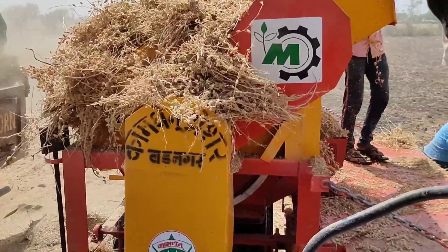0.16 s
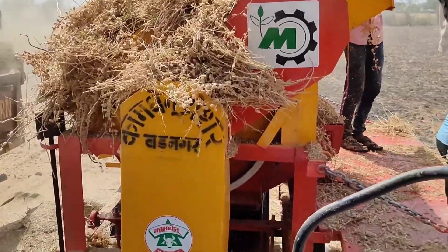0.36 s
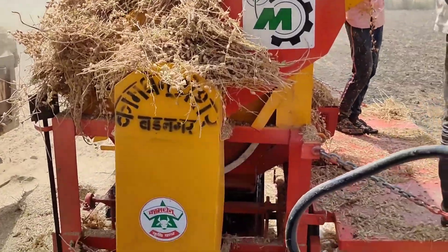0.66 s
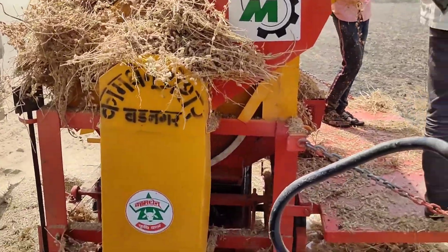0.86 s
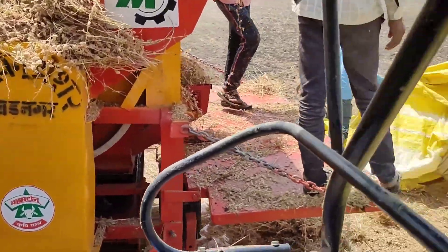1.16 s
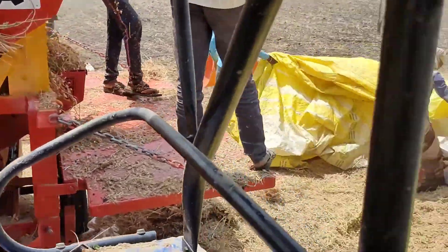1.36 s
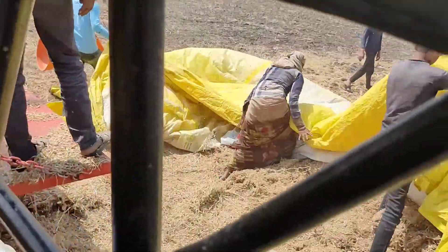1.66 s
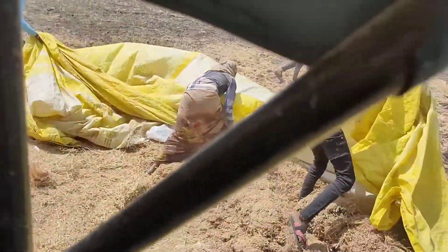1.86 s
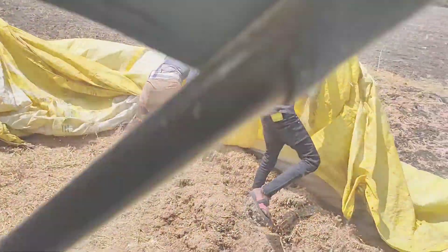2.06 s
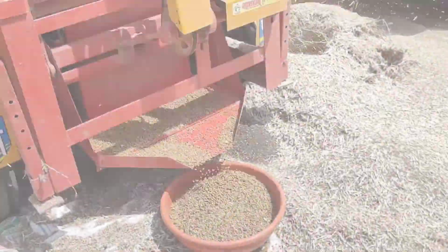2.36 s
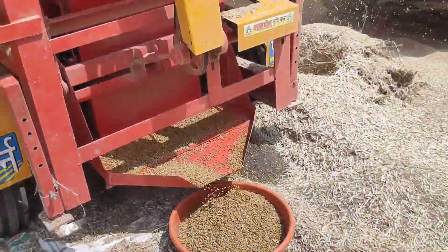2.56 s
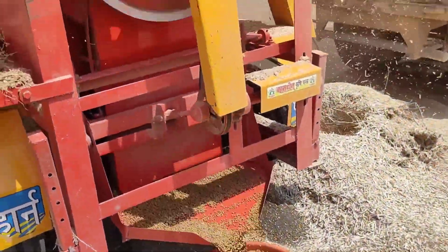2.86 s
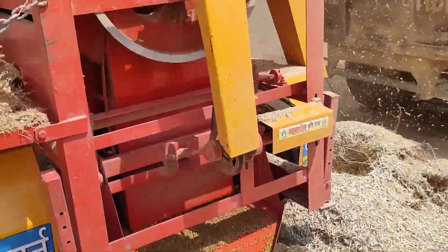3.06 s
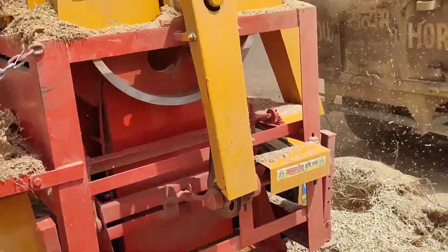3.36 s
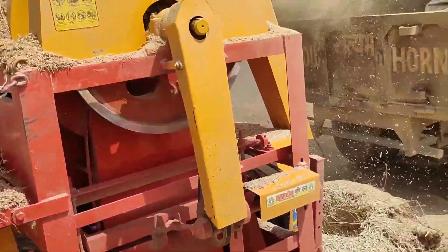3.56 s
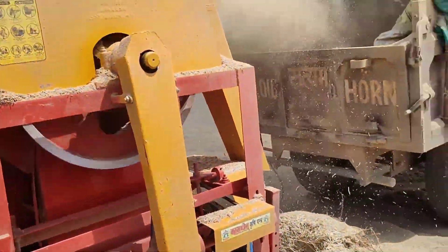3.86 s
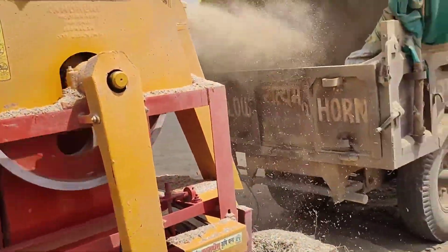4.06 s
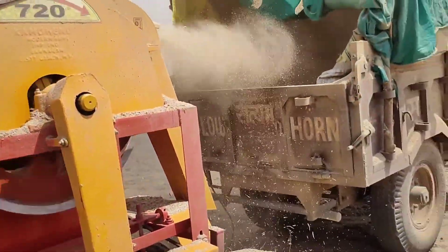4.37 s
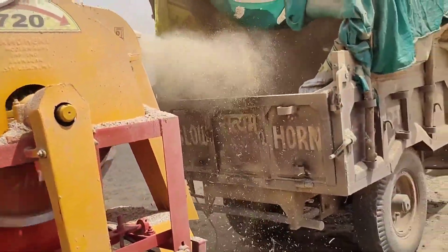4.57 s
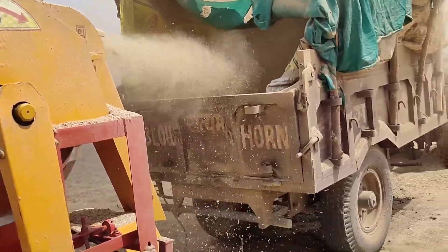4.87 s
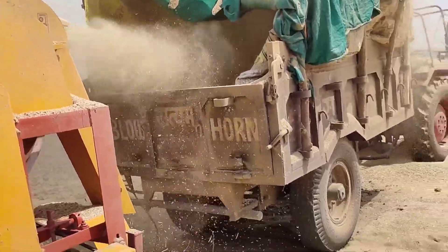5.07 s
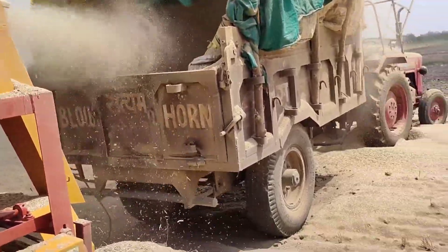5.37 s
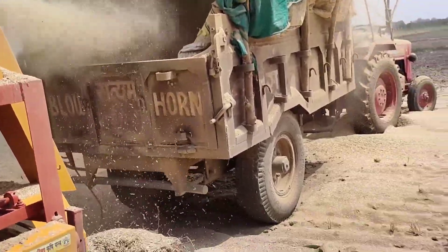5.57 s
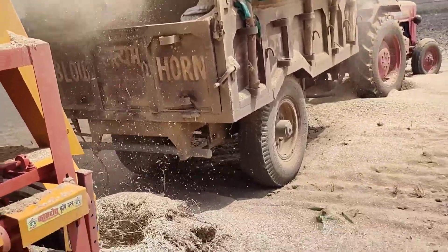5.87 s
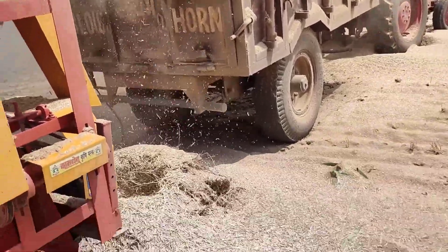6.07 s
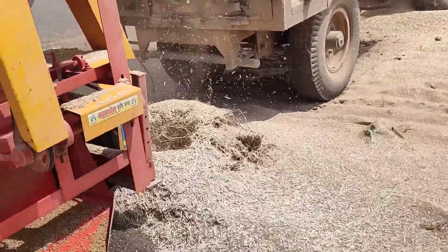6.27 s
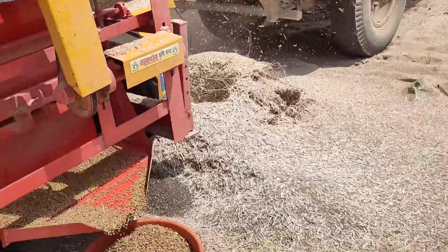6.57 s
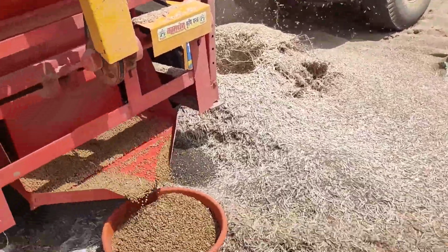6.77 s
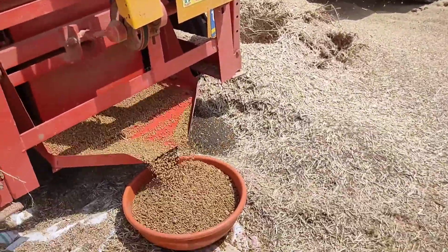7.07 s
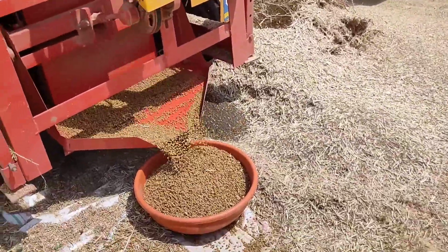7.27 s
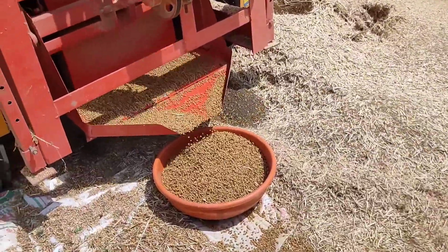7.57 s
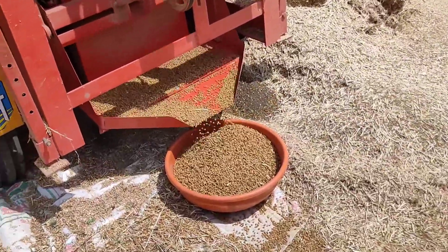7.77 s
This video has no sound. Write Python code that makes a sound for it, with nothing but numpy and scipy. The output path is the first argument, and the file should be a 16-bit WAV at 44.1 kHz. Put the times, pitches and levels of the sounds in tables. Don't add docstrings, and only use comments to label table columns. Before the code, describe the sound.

A three-cylinder diesel clatters beside a running thresher, fades to silence, then the grain chute fades in with throbbing blower, shaking sieves and sharp chaff hiss.

```python
import sys
import numpy as np
from scipy import signal
from scipy.fft import rfft, irfft, next_fast_len
from scipy.io import wavfile
from scipy.ndimage import map_coordinates

SR = 44100
rng = np.random.default_rng(int(sys.argv[2]) if len(sys.argv) > 2 else 0)


def invert_db(level):
    return 10 ** (np.asarray(level, dtype=float) / 20)


def unload_audio(sound):
    columns = np.transpose(np.atleast_2d(sound))
    steps = np.round(np.clip(columns, -1, 1) * 32767)
    wavfile.write(sys.argv[1], SR, steps.astype(np.int16))


N = 349713

CHANGE_S, FADE_S = 2.258, 0.5
ENGINE_GEAR, SIEVE_GEAR = 1.2231, 0.5405
HANDFUL_T60_S, HANDFUL_RISE_S = 0.052, 0.0024
SURGE_S, OUTLET_DB = 0.14, -50
HUM_TURNS_AWAY = -0.08

# t/s, speed/(turns per s)
SPEED_NEAR = [(0.0, 9.8143), (1.13, 9.8254), (2.26, 9.8345)]
SPEED_CHUTE = [(2.26, 8.8577), (3.07, 8.8539), (3.88, 8.8767), (4.69, 8.8989), (5.5, 8.9341), (6.31, 8.869),
               (7.12, 8.8144), (7.93, 8.83)]
# multiple of the engine cycle, level/dB
ENGINE_NEAR = [(3, -41), (6, -27), (7, -51), (9, -25), (10, -42), (12, -43), (13, -45), (15, -38),
               (18, -39), (19, -49), (24, -46), (25, -49), (33, -47), (35, -52), (36, -49), (39, -48),
               (40, -50), (48, -53), (50, -54), (58, -49), (59, -55), (62, -52), (66, -52), (69, -54),
               (80, -52), (81, -54), (86, -55), (92, -53), (95, -54), (96, -47)]
ENGINE_CHUTE = [(3, -47), (6, -42), (9, -40), (10, -54), (11, -55), (12, -53), (15, -50), (18, -57),
                (21, -52), (27, -56), (30, -57)]
# multiple of the shaft turn, level/dB
BLOWER_NEAR = [(4, -33), (5, -51), (8, -32), (9, -55), (12, -46), (16, -42), (20, -34), (24, -42),
               (28, -41), (32, -46)]
BLOWER_CHUTE = [(4, -34), (5, -49), (6, -54), (8, -32), (9, -49), (10, -57), (12, -46), (13, -56),
                (16, -52), (20, -45), (21, -50), (25, -52), (28, -40), (29, -43), (30, -46), (31, -55),
                (32, -41), (33, -48), (36, -49), (40, -50)]
# f/Hz, width/Hz, level/dB, crank angle/turns, cylinder 1 and cylinder 2
# level/dB (cylinder 3 is the reference)
KNOCK = [
    (928, 320, -41.5, 0.036, -8, 10.5),
    (1337, 400, -40.5, 0.057, 1.5, 0.5),
    (2590, 1800, -42, .16, -5, -1.5),
]
# f/Hz, level/dB
CHAFF_NEAR = [(2470, -35), (4200, -12), (4930, -5), (5320, -6), (6190, 0.5), (6590, 0.5), (7380, -4.5),
              (7810, -12.5), (8570, -41), (11100, -60), (18900, -120)]
CHAFF_CHUTE = [(2470, -39.5), (4200, -13), (4890, -7.5), (6140, 1), (6610, 1.5), (7630, -5), (7960, -18),
               (8570, -35), (11100, -66.5), (18900, -120)]
# f/Hz, level/dB
STRAW_NEAR = [(970, -31.5), (1650, -1), (2010, 2), (2190, -2), (3870, -4.5), (4200, -5), (5460, -33.5),
              (9240, -120)]
STRAW_CHUTE = [(970, -31), (1650, -8.5), (1820, -6), (2090, -5), (2400, -6.5), (4200, -1), (5460, -23.5),
               (9240, -120)]
# f/Hz, level/dB
HOOD_NEAR = [(510, -28), (860, 0), (911, -2), (1150, 0.5), (1330, -1), (1410, -2.5), (1650, -7),
             (2140, -34), (3630, -120)]
HOOD_CHUTE = [(510, -40), (860, -6.5), (988, -2), (1090, -6), (1220, -8), (1290, -5.5), (1520, -7),
              (1650, -7), (2140, -34), (3630, -120)]
# f/Hz, level/dB
CASING_NEAR = [(310, -28), (520, 0.5), (678, -0.5), (745, -3.5), (860, -2), (1120, -30.5), (1890, -120)]
CASING_CHUTE = [(310, -28.5), (520, -9), (555, -4), (662, -4), (752, 0), (860, -6), (1120, -33),
                (1890, -120)]
# f/Hz, level/dB
RUMBLE_NEAR = [(15, -43), (30, -15), (90, -9), (135, -5.5), (185, -2), (230, -4.5), (330, -3), (420, -7.5),
               (490, -5), (560, -25), (700, -64)]
RUMBLE_CHUTE = [(15, -41.5), (30, -20), (60, -14.5), (130, -9), (200, -3.5), (250, -3.5), (320, -7),
                (370, -10), (520, -10), (560, -18), (700, -61.5)]
LEVELS_NEAR = [-34, -32.5, -36.5, -27.5]
LEVELS_CHUTE = [-35, -38, -44, -31]
TURNS_AWAY = [-0.093, 0.0031, -0.55, 0.036]
# f/Hz, width/Hz, level/dB
PANELS_NEAR = [(168, 14, -45.5), (186.3, 5.4, -42.5), (313, 8.9, -46), (381.6, 9.2, -42.5),
               (400.6, 4.1, -45.5), (1403, 16, -45), (1446, 11, -50), (1594, 12, -55.5), (2055, 15, -51.5)]
PANELS_CHUTE = [(229.6, 11, -47.5), (250, 11, -41.5), (314, 8.2, -45.5), (332, 7, -48), (441, 9.3, -54),
                (510, 10, -54), (736, 7.9, -55), (906, 7.6, -54.5), (970, 6.6, -53.5), (1030, 11, -53.5),
                (1460, 9.1, -53.5), (1558, 10, -56.5)]
# t/s, chaff flow level/dB, facing/dB (+ toward the chaff stream, - toward the machine)
PAN_NEAR = [(0.0, -23.5, -0.45), (0.12, -22, 0.047), (0.8, -23.5, 0.042), (1.3, -23, 0), (1.8, -25.5, 0.3),
            (2.2, -24, -0.5)]
PAN_CHUTE = [(2.3, -20, -3.5), (2.7, -22.5, -4.5), (3.05, -20.5, -4), (3.4, -21, -2), (3.65, -19.5, 1.2),
             (4.35, -20.5, 6), (5.8, -20.5, 4), (6.4, -20.5, -1.5), (6.95, -21.5, -6), (7.12, -23.5, -5),
             (7.42, -24, -6), (7.75, -22, -6.5)]
# t/s, peak level/dB
HANDFULS = [(0.0458, -13.5), (2.4049, -14), (2.7656, -9), (2.8903, -6), (3.0809, -6), (3.3154, -6.5),
            (3.6536, -2.5), (3.7354, -9.5), (4.122, -7.5), (4.3011, -7), (4.3555, -10), (4.4238, -7.5),
            (4.4697, -9), (4.5965, -4.5), (4.7002, -8.5), (4.9127, -12), (4.9551, -11), (5.1861, -12.5),
            (5.4101, -6.5), (5.5059, -8.5), (5.7284, -8), (5.908, -6), (6.3804, -11), (6.4782, -4.5),
            (6.5275, -10), (6.9461, -9.5), (6.994, -6), (7.1337, -9.5), (7.5218, -6), (7.7114, -10.5)]
# f/Hz, width/Hz, level/dB
SIEVE = [(720, 230, -9.5), (1150, 93, -7.5), (1550, 140, -4.5), (2110, 150, -2), (3600, 910, -7)]
# t/s, level/dB over the resting outlet
SURGES = [(3.0, 8), (3.5, 3), (3.82, 5), (4.4, 4.5), (4.8, 3), (5.25, 6), (5.75, 9.5), (6.75, 9),
          (7.45, 4.5), (7.85, 10)]
# f/Hz, width/Hz, level/dB
OUTLET = [(979, 70, 0)]


def unit(x):
    return x / np.sqrt(np.mean(x ** 2) + 1e-20)


def curves(rows):
    s, *columns = np.transpose(rows)
    return [np.interp(np.arange(N) / SR, s, column) for column in columns]


def wobble(rate):
    coarse = np.arange(0, N + 64, 64)
    knots = rng.standard_normal(int(N * rate / SR) + 4)
    smooth = map_coordinates(knots, [coarse * rate / SR])
    return np.interp(np.arange(N), coarse, smooth)


def filtered(x, response):
    m = next_fast_len(N + SR // 2)
    return irfft(rfft(x, m) * response(np.fft.rfftfreq(m, 1 / SR)), m)[:N]


def colour(x, spectrum):
    hz, db = np.transpose(spectrum)
    return unit(filtered(x, lambda f: invert_db(np.interp(np.log(f + 1), np.log(hz + 1), db))))


def resonate(x, modes):
    def ring(f):
        total = 0
        for k, (hz, width_hz, db) in enumerate(modes):
            damping = 1j * f * width_hz
            total = total + (-1) ** k * invert_db(db) * damping / (hz * hz - f * f + damping)
        return total
    return unit(filtered(x, ring))


def grit(spread_db):
    return rng.standard_normal(N) * invert_db(spread_db * rng.standard_normal(N))


def shaft(speed, start_s):
    turns = np.cumsum(curves(speed)[0]) / SR
    return turns - turns[round(start_s * SR)]


def blows(turns, angle, fall):
    since = (turns - angle) % 1
    return since / fall * np.exp(1 - since / fall)


def tones(turns, orders, count, start, lead, lag, uneven, flutter_db):
    out = np.zeros(N)
    for multiple, db in orders:
        k = round(multiple)
        phase = k * (turns + lead) + start + lag / k + uneven * (k % count)
        unsteady = flutter_db * k / 10 * wobble(4)
        out += invert_db(db + unsteady) * np.sqrt(2) * np.cos(2 * np.pi * phase)
    return out


def knock(cycle):
    out = np.zeros(N)
    for hz, width_hz, db, angle, first_db, second_db in KNOCK:
        same = rng.standard_normal(3600)[(cycle % 1 * 3600).astype(int)]
        cylinder = ((cycle - angle) % 1 * 3).astype(int)
        size = invert_db([first_db, second_db, 0])[cylinder]
        rattle = same + 0.67 * rng.standard_normal(N)
        burst = size * blows(3 * cycle, 3 * angle, fall=0.16) * rattle
        band = [(hz, width_hz, 0)]
        out += invert_db(db) * resonate(resonate(burst, band), band)
    return out


def thresher(turns, pan, levels, colours, clumps, below_db, throb_db, limp_db):
    straw, hood, casing, rumble = colours
    facing_db = curves(pan)[1]
    straw_db, hood_db, casing_db, rumble_db = (db + per * facing_db for db, per in zip(levels, TURNS_AWAY))
    blade = throb_db * np.cos(2 * np.pi * (4 * turns - 0.4))
    limp = limp_db * np.cos(2 * np.pi * (turns - 0.47))

    rustle_db = straw_db + 0.02 + 0.5 * clumps + 0.52 * wobble(12)
    rustle = invert_db(rustle_db) * colour(grit(spread_db=3), straw)
    roar_db = hood_db - 1.45 + blade + 0.68 * clumps + 0.76 * wobble(12)
    roar = invert_db(roar_db) * colour(rng.standard_normal(N), hood)
    drone_db = casing_db - 0.35 + blade + 0.53 * wobble(11)
    drone = invert_db(drone_db) * colour(rng.standard_normal(N), casing)
    low = invert_db(rumble_db - below_db + blade + limp) * colour(rng.standard_normal(N), rumble)
    return rustle + roar + drone + low


def panels(modes):
    def ring(f):
        total = 0
        for hz, width_hz, db in modes:
            peak = 1 / (1 + (2 * (f - hz) / width_hz) ** 2)
            peak = peak / np.sqrt(np.pi * width_hz / 2 / SR)
            total = total + invert_db(db) * peak
        return total
    return filtered(rng.standard_normal(N), ring)


def chaff(pan, spectrum, clumps):
    flow_db, facing_db = curves(pan)
    grains = colour(grit(spread_db=3), spectrum)
    lower = filtered(grains, lambda f: 1 / (1 + (f / 5600) ** 6))
    upper = grains - lower
    tilted = invert_db(-0.7 * facing_db) * lower + invert_db(0.41 * facing_db) * upper
    return invert_db(flow_db - 0.56 + 0.5 * clumps + 0.9 * wobble(60)) * tilted


def near_engine():
    turns, clumps = shaft(SPEED_NEAR, 0), wobble(30.1)
    cycle = ENGINE_GEAR * turns
    exhaust = tones(cycle, ENGINE_NEAR, count=3, start=-0.613 + 1, lead=-0.045, lag=1.7,
                    uneven=-0.1, flutter_db=0.3)
    blower = tones(turns, BLOWER_NEAR, count=4, start=-0.378, lead=0.059, lag=1.57,
                   uneven=-0.38, flutter_db=0.4)
    colours = STRAW_NEAR, HOOD_NEAR, CASING_NEAR, RUMBLE_NEAR
    body = thresher(turns, PAN_NEAR, LEVELS_NEAR, colours, clumps, below_db=2.0, throb_db=-0.4, limp_db=-0.6)
    hiss = chaff(PAN_NEAR, CHAFF_NEAR, clumps)
    return exhaust + knock(cycle) + blower + body + panels(PANELS_NEAR) + hiss


def handfuls():
    size, t = np.zeros(N + SR), np.arange(SR // 5) / SR
    spurt = invert_db(-60 * t / HANDFUL_T60_S) * (1 - np.exp(-t / HANDFUL_RISE_S))
    for s, db in HANDFULS:
        size[round(s * SR):][:len(t)] += invert_db(db) * spurt
    return invert_db(-6.0) * size[:N] * colour(rng.standard_normal(N), CHAFF_CHUTE)


def sieves(turns):
    stroke = SIEVE_GEAR * turns
    throw = blows(stroke, angle=0.03, fall=0.07) + 0.44 * blows(stroke, angle=0.65, fall=0.034)
    return invert_db(-43.0 + 1.2 * wobble(2.7)) * resonate(throw * grit(spread_db=1.5), SIEVE)


def outlet(turns):
    t = np.arange(N) / SR
    swell_db = sum(db * np.exp(-((t - s) / SURGE_S) ** 2) for s, db in SURGES)
    push = 1 + 0.89 * np.cos(2 * np.pi * (4 * turns - 0.2))
    air = push * rng.standard_normal(N)
    return invert_db(OUTLET_DB + swell_db) * resonate(resonate(air, OUTLET), OUTLET)


def grain_chute():
    turns, clumps = shaft(SPEED_CHUTE, CHANGE_S), wobble(30)
    cycle = ENGINE_GEAR * turns
    exhaust = tones(cycle, ENGINE_CHUTE, count=3, start=-0.137, lead=-0.07, lag=5.2,
                    uneven=-0.1, flutter_db=0.6)
    blower = tones(turns, BLOWER_CHUTE, count=4, start=-0.387, lead=0.113, lag=1.62,
                   uneven=-0.48, flutter_db=0.5)
    hum = (exhaust + blower) * invert_db(HUM_TURNS_AWAY * curves(PAN_CHUTE)[1])
    colours = STRAW_CHUTE, HOOD_CHUTE, CASING_CHUTE, RUMBLE_CHUTE
    body = thresher(turns, PAN_CHUTE, LEVELS_CHUTE, colours, clumps, below_db=5, throb_db=0.4, limp_db=1.4)
    hiss = chaff(PAN_CHUTE, CHAFF_CHUTE, clumps)
    return hum + body + panels(PANELS_CHUTE) + sieves(turns) + hiss + outlet(turns)


def scene():
    t = np.arange(N) / SR
    fade = np.clip(np.abs(t - CHANGE_S) / FADE_S + 0.003, 0, 1)
    place = np.where(t < CHANGE_S, near_engine(), grain_chute())
    return (fade * place + handfuls())[None]


def roll_off(x):
    return signal.sosfilt(signal.butter(12, 8530, fs=SR, output="sos"), x)


def record(dry):
    mix = filtered(dry[0], lambda f: 1 / (1 + (f / 8480) ** 120))[None]
    return roll_off(mix)


dry = scene()
out = record(dry)
unload_audio(out)
```